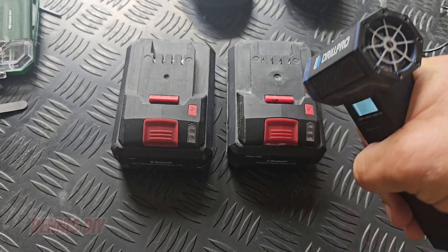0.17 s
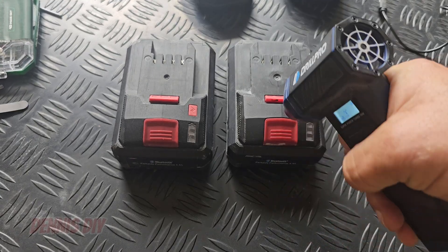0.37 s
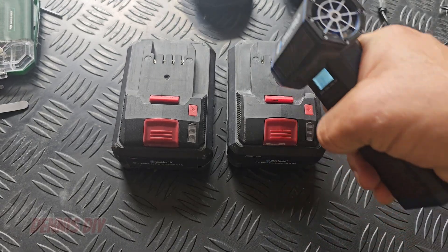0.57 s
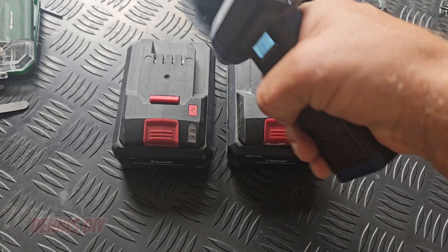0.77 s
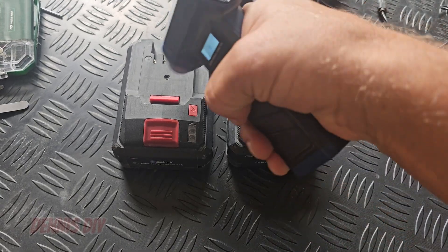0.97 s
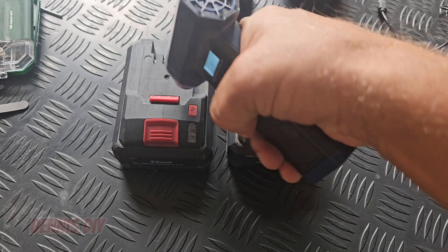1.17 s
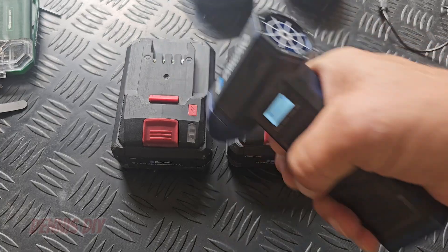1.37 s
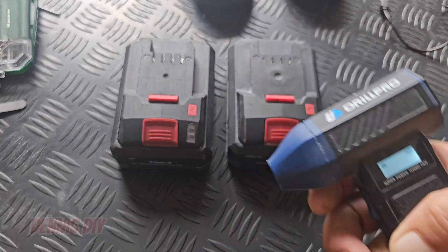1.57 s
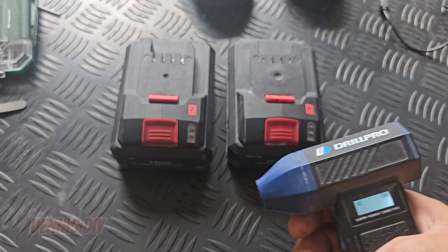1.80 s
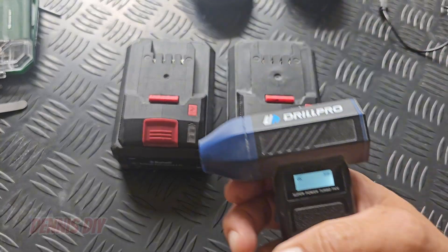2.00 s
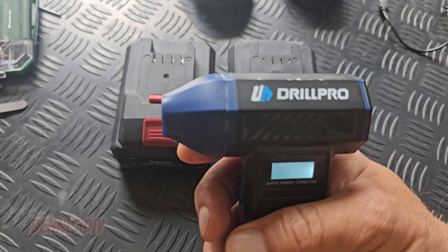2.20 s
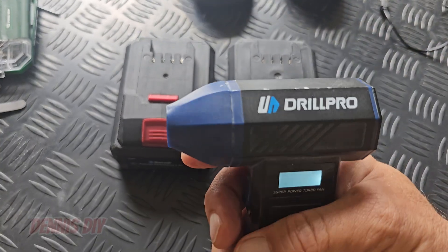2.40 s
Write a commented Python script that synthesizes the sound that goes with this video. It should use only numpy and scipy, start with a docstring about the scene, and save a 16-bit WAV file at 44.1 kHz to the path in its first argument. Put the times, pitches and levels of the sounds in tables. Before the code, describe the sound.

Very close and dry, a small high-speed fan blasts hissing air with a piercing tone for a second and a half, then coasts down quickly in falling whistles, ending in near quiet with a soft low rustle.

```python
"""A handheld electric blower runs flat out close to a microphone and is turned about in the hand.
The trigger is let go and the rotor coasts down: shaft tones and blade whistles glide downwards,
as sine waves locked to one falling speed and swelling at resonances of the housing and short duct.
The air roar is shaped noise in six bands. Low noise buffets the microphone, and a low rustle,
a short burst of grainy noise, passes at the end."""
import sys
import numpy as np
from scipy import signal
from scipy.fft import rfft, irfft, next_fast_len
from scipy.io import wavfile
from scipy.ndimage import uniform_filter1d, map_coordinates

SR = 44100
rng = np.random.default_rng(int(sys.argv[2]) if len(sys.argv) > 2 else 0)


def wav_out(sig):
    """Save sig, one row per channel (or a flat mono array), as 16-bit PCM at SR to the path in sys.argv[1]."""
    wavfile.write(sys.argv[1], SR, np.round(np.clip(np.atleast_2d(sig).T, -1, 1) * 32767).astype(np.int16))


def gain_from_db(level_db):
    """Convert decibel levels to linear amplitude factors (20 dB per decade)."""
    decades = np.asarray(level_db, float) / 20
    return 10 ** decades


N = 107868  # length in samples

# Shaft speed under power: time_s, turns_per_second_hz
POWERED_SPEED = [(0, 1957), (.5, 1945), (1.468, 1935)]
# Coasting: each second the speed falls by DRAG * speed^2 + FRICTION
RELEASE_S, DRAG, FRICTION = 1.468, .002292, 307

# Air noise in six bands: time_s, low_roar_db, throat_roar_db, middle_db, upper_middle_db, treble_db, top_db
AIR_LEVELS = [(0.0, -26, -15, -17.5, -16, -19, -24), (0.09, -23.5, -15.5, -19, -16, -19.5, -24),
              (0.4, -21, -16.5, -16.5, -16.5, -20, -25), (0.43, -24.5, -15, -20.5, -19, -23.5, -27),
              (0.54, -22.5, -19.5, -17.5, -16, -17, -23.5), (0.62, -27.5, -16, -17, -16, -23.5, -28),
              (0.73, -26, -16.5, -18.5, -18, -21.5, -22.5), (1.2, -27, -18.5, -19, -13, -24.5, -28),
              (1.32, -28, -15.5, -12.5, -18.5, -24.5, -26), (1.41, -24, -17.5, -22.5, -19.5, -21.5, -20),
              (1.49, -35.5, -24.5, -27.5, -19, -18, -24), (1.55, -38.5, -25, -22, -20.5, -22, -28.5),
              (1.64, -42.5, -32.5, -25, -23.5, -28.5, -29), (1.9, -48, -38.5, -34.5, -30.5, -32, -38),
              (2.23, -55.5, -46, -44.5, -41, -46.5, -54.5), (2.26, -52, -48, -41.5, -44.5, -48, -52),
              (2.33, -48, -45.5, -42, -40.5, -45.5, -50.5), (2.44, -56, -53, -47, -47, -55, -60)]
# Borders between those bands: border_hz
AIR_BORDERS = [1080, 2100, 3700, 6400, 9200]
# Colour of the air under power: pitch_hz, relative_level_db_per_hz
JET_COLOUR = [(59, -59), (100, -24.5), (288, -23), (356, -17), (657, -12), (1120, -16), (1240, -10.5),
              (1600, -5.5), (1780, -5), (1890, -7), (2020, -11), (2150, -9.5), (2770, -2.5), (3280, -4),
              (3650, -12), (4320, -4.5), (5010, -12), (5690, -5), (6320, -13.5), (7180, -14.5),
              (8150, -21.5), (10100, -16.5), (11000, -22.5), (13000, -26), (15700, -35)]
# Colour of the air while coasting, before the duct: pitch_hz, relative_level_db_per_hz
COAST_COLOUR = [(59, -57), (100, -25.5), (566, -18), (760, -16), (939, -21), (1370, -5.5), (2230, -9),
                (5900, -5), (10700, -15), (15600, -28)]
JET_FADE_S = 0.063  # the powered colour gives way to the coasting one
# A narrow band of hiss in the powered jet
HISS_HZ, HISS_WIDTH_HZ, HISS_DB = 9990, 180, 7

# Resonances of the short duct, for one pass: centre_hz, width_hz, gain_db
DUCT_RESONANCES = [(1400, 400, -10), (2990, 590, 1.5), (4400, 280, -5), (5000, 330, -3), (5900, 330, 0),
                   (7270, 500, 0.5), (8750, 480, -1.5), (10430, 340, -1.5), (12030, 450, -4),
                   (13280, 520, -4), (15050, 600, -2)]
# Resonances of the housing, for one pass: centre_hz, width_hz, gain_db
HOUSING_RESONANCES = [(2600, 450, 0), (3050, 500, -1), (3650, 350, -5), (4270, 350, 2), (5480, 250, -3),
                      (6200, 260, 0), (6850, 300, -3), (7500, 350, -1), (9700, 500, -2)]

# Shaft tone under power: time_s, level_db
SHAFT_POWERED = [(0.0, -23), (0.174, -28.5), (0.284, -22), (0.446, -23.5), (0.804, -14.5), (1.032, -24),
                 (1.118, -19), (1.17, -25), (1.414, -11.5), (1.46, -16.5)]
# Shaft tone while coasting: time_s, level_db
SHAFT_COASTING = [(1.49, -23), (1.52, -31), (1.6, -39), (1.63, -46), (1.93, -55), (2.0, -66)]
# Overtones of the shaft before the housing: multiple_of_shaft_speed, relative_level_db
SHAFT_OVERTONES = [(2, -1), (3, 2), (4, -2), (5, -3), (6, -9)]
# Level shared by the overtones before the housing: time_s, level_db
OVERTONE_LEVEL = [(0, -30), (1.47, -29), (1.49, -21), (1.59, -22), (1.615, -44), (1.89, -45), (1.94, -32),
                  (2.01, -31), (2.06, -35), (2.08, -55)]

# Buffeting of the microphone: time_s, level_db
BUFFET_LEVEL = [(0.0, -28), (0.05, -27.5), (0.18, -37.5), (0.53, -35.5), (0.64, -44), (0.71, -33.5),
                (1.04, -53), (1.47, -38.5), (1.53, -44), (1.6, -36.5), (1.64, -51), (2.09, -69), (2.4, -59),
                (2.44, -67)]
# Colour of the buffeting: pitch_hz, relative_level_db_per_hz
BUFFET_COLOUR = [(12, -43), (20, -21), (59, 3), (97, 1), (173, -4.5), (260, -7.5), (340, -25), (570, -120)]

BLADES = 13
# Blade whistle before the duct: time_s, level_db
BLADE_LEVEL = [(1.61, -26), (1.65, -17), (1.7, -23), (1.75, -22), (1.85, -24), (1.95, -28), (2.07, -26),
               (2.16, -29), (2.24, -29), (2.33, -65)]
# Second harmonic of the blade whistle: time_s, level_db
BLADE_TWICE_LEVEL = [(1.89, -48), (1.95, -55), (1.995, -64), (2.015, -46), (2.05, -59), (2.075, -52),
                     (2.15, -66), (2.21, -53), (2.25, -70)]

# Low rustle; its level falls by RUSTLE_FALL dB a second
RUSTLE_S, RUSTLE_RISE_S, RUSTLE_FALL = 2.238, .022, 55
RUSTLE_DB, RUSTLE_GRAIN_DB, RUSTLE_HZ, RUSTLE_WIDTH_HZ = -40, 2, 410, 330


def unit(x):
    """Scales a sound to an rms of 1."""
    return x / np.sqrt(np.mean(x ** 2) + 1e-20)


def along(points, hz):
    """Reads a table of (Hz, value) points on a log frequency axis."""
    f, v = np.transpose(points)
    return np.interp(np.log(hz + 1), np.log(f + 1), v)


def curves(rows):
    """Gives one value per sample for each column after the time."""
    s, *cols = np.transpose(rows)
    return [np.interp(np.arange(N) / SR, s, c) for c in cols]


def wobble(rate):
    """A smooth random curve through `rate` random points a second."""
    points = rng.standard_normal(int(N * rate / SR) + 4)
    return map_coordinates(points, [np.arange(N) * rate / SR])


def filtered(x, response):
    """Multiplies the spectrum of x by a response that depends on frequency."""
    m = next_fast_len(N + 8192)
    return irfft(rfft(x, m) * response(np.fft.rfftfreq(m, 1 / SR)), m)[..., :N]


def patchy(patchy_db):
    """White noise whose gain varies in random patches of time and frequency."""
    z = signal.stft(rng.standard_normal(N + 512), nperseg=512)[2]
    field = uniform_filter1d(rng.standard_normal(z.shape), size=7, axis=0)
    field = uniform_filter1d(field, size=10, axis=1)
    return signal.istft(z * gain_from_db(patchy_db * unit(field)), nperseg=512)[1][:N]


def peaks(table, hz):
    """Gain at each frequency of a set of resonances, adding their powers."""
    return np.sqrt(sum(gain_from_db(2 * db) / (1 + (2 * (hz - c) / w) ** 2) for c, w, db in table))


def air():
    """Turbulence in six bands: the broad jet colour fades into the ribbed colour of the coasting duct."""
    jet_noise, coast_noise = patchy(patchy_db=1.38), patchy(patchy_db=1.2)
    share = np.clip((np.arange(N) / SR - RELEASE_S) / JET_FADE_S, 0, 1)
    shared_db = 0.65 * wobble(30.14)
    edges, out = [0, *AIR_BORDERS, SR], 0
    for lo, hi, db in zip(edges, edges[1:], curves(AIR_LEVELS)):
        def band(hz):
            return (hz >= lo) & (hz < hi)

        def jet_response(hz):
            hiss_db = HISS_DB * np.exp(-((hz - HISS_HZ) / HISS_WIDTH_HZ) ** 2)
            return band(hz) * gain_from_db(along(JET_COLOUR, hz) + hiss_db)

        def coast_response(hz):
            return band(hz) * gain_from_db(along(COAST_COLOUR, hz)) * peaks(DUCT_RESONANCES, hz)

        jet = unit(filtered(jet_noise, jet_response))
        coast = unit(filtered(coast_noise, coast_response))
        mixed = np.sqrt(1 - share) * jet + np.sqrt(share) * coast
        out = out + gain_from_db(db + shared_db + 0.48 * wobble(30.26)) * mixed
    return out


def speed():
    """Shaft turns a second: nearly steady, then slowed by air drag and bearing friction."""
    running, = curves(POWERED_SPEED)
    since = np.maximum(np.arange(N) / SR - RELEASE_S, 0)
    knee = np.sqrt(FRICTION / DRAG)  # speed at which drag equals friction
    return knee * np.tan(np.arctan(running / knee) - np.sqrt(DRAG * FRICTION) * since)


def tone(multiple, hz, db, flutter_db, jitter):
    """A sine at a multiple of the shaft speed, unsteady in level and phase (jitter in radians)."""
    turns = 2 * np.pi * np.cumsum(hz) / SR
    level = np.sqrt(2) * gain_from_db(db + flutter_db * wobble(70))
    wave = np.sin(multiple * turns + jitter * (wobble(60) + wobble(250)))
    return level * wave * (multiple * hz < SR / 2.2)  # silent where too high to be heard


def shaft(hz):
    """The shaft sounds once a turn; unloaded, in coasting, it runs rougher."""
    coasting = np.arange(N) / SR > SHAFT_COASTING[1][0]
    db, = curves(SHAFT_POWERED + SHAFT_COASTING)
    return tone(1, hz, db, flutter_db=np.where(coasting, 3, 1), jitter=np.where(coasting, .5, .08))


def overtones(hz):
    """Whole multiples of the shaft tone make the housing ring as they cross its resonances."""
    shared_db, = curves(OVERTONE_LEVEL)
    out = 0
    for multiple, db in SHAFT_OVERTONES:
        source = tone(multiple, hz, db + shared_db, flutter_db=2, jitter=.35)
        out = out + source * peaks(HOUSING_RESONANCES, multiple * hz) ** 2  # two passes
    return out


def buffet():
    """Lumpy low wind on the microphone port: low noise of uneven level."""
    low = unit(filtered(rng.standard_normal(N), lambda hz: gain_from_db(along(BUFFET_COLOUR, hz))))
    return gain_from_db(curves(BUFFET_LEVEL)[0] + 2.0 * wobble(19)) * low


def blade_whistle(hz):
    """Each passing blade gives one cycle of a whistle, which glides through the duct resonances."""
    source = tone(BLADES, hz, curves(BLADE_LEVEL)[0], flutter_db=2, jitter=.35)
    return source * peaks(DUCT_RESONANCES, BLADES * hz) ** 2  # two passes


def blade_second_harmonic(hz):
    """A weaker whistle at twice the blade-passing pitch, without the duct."""
    return tone(2 * BLADES, hz, curves(BLADE_TWICE_LEVEL)[0], flutter_db=3, jitter=.4)


def rustle():
    """Noise around one low pitch that starts quickly, flutters in level and fades."""
    t = np.arange(N) / SR - RUSTLE_S
    rise = np.clip(t / RUSTLE_RISE_S, 0, 1)
    db = RUSTLE_DB - RUSTLE_FALL * t.clip(0) + RUSTLE_GRAIN_DB * wobble(80)

    def body(hz):
        return 1 / (1 + (2 * (hz - RUSTLE_HZ) / RUSTLE_WIDTH_HZ) ** 2)

    return rise * gain_from_db(db) * unit(filtered(rng.standard_normal(N), body))


def scene():
    """Adds all the sounds at one microphone, which feeds both channels."""
    hz = speed()
    rotor = shaft(hz) + overtones(hz) + blade_whistle(hz) + blade_second_harmonic(hz)
    return np.tile(air() + rotor + buffet() + rustle(), (2, 1))


def low_pass(x):
    """Removes everything above the highest recorded frequency."""
    return signal.sosfilt(signal.butter(12, 16880, fs=SR, output="sos"), x)


def record(dry):
    """Rounds the peaks under a ceiling, then cuts the lowest bass and the highest treble."""
    ceiling, top_hz, bottom_hz = 0.85, 15720, 32
    rounded = dry / (1 + np.abs(dry / ceiling) ** 6) ** (1 / 6)
    mix = filtered(rounded, lambda hz: (hz < top_hz) / (1 + (bottom_hz / (hz + 1)) ** 4))
    return low_pass(mix)


dry = scene()
out = record(dry)
wav_out(out)
```